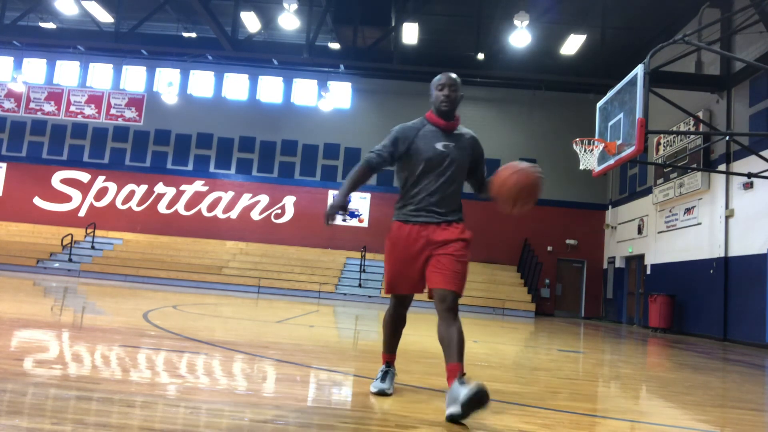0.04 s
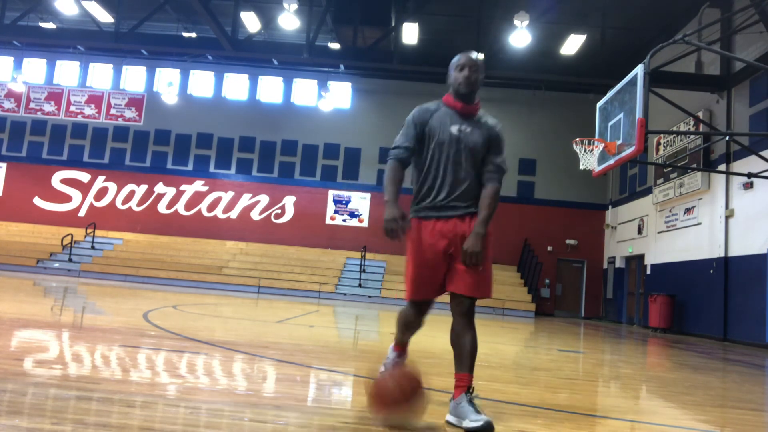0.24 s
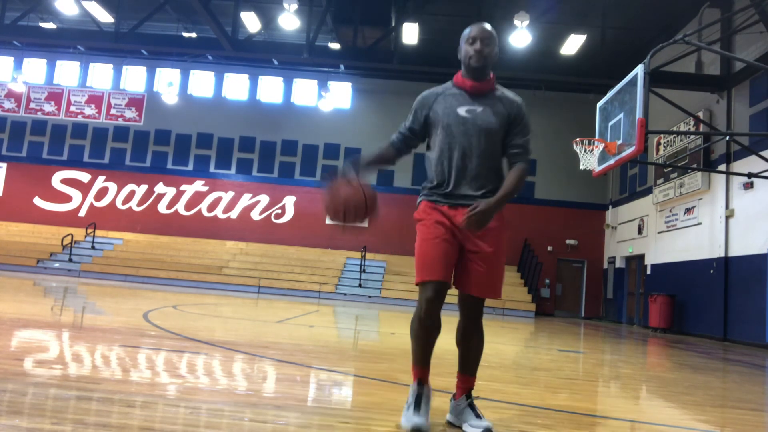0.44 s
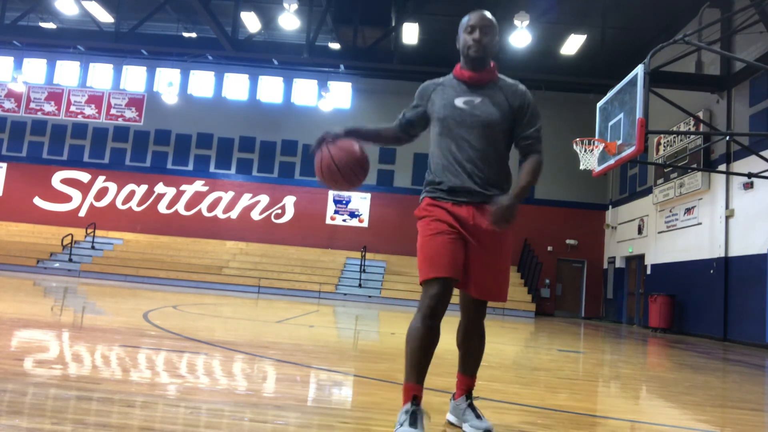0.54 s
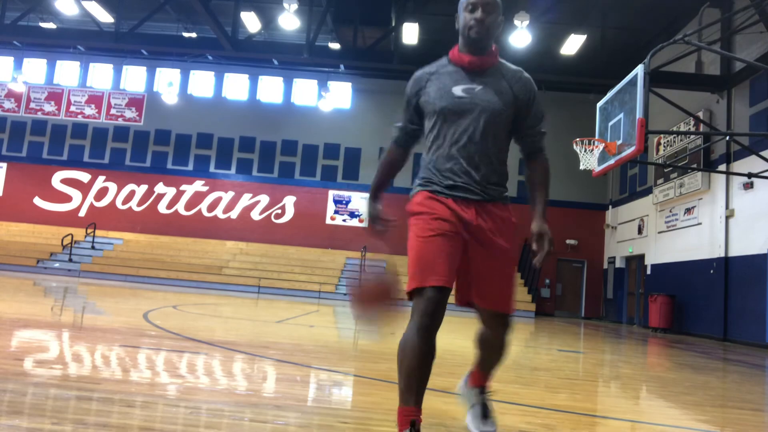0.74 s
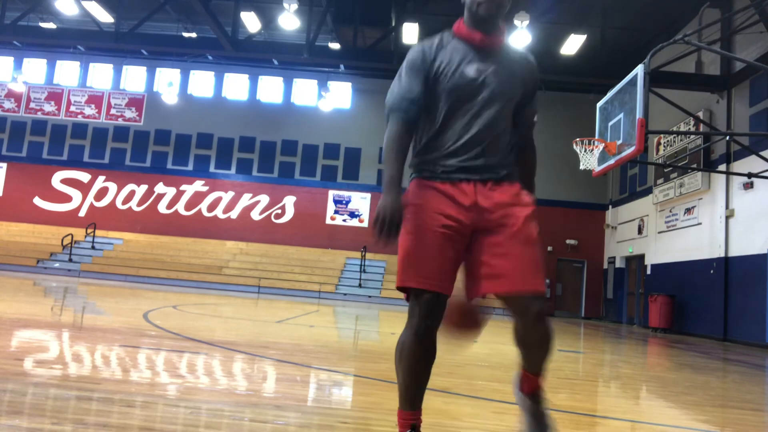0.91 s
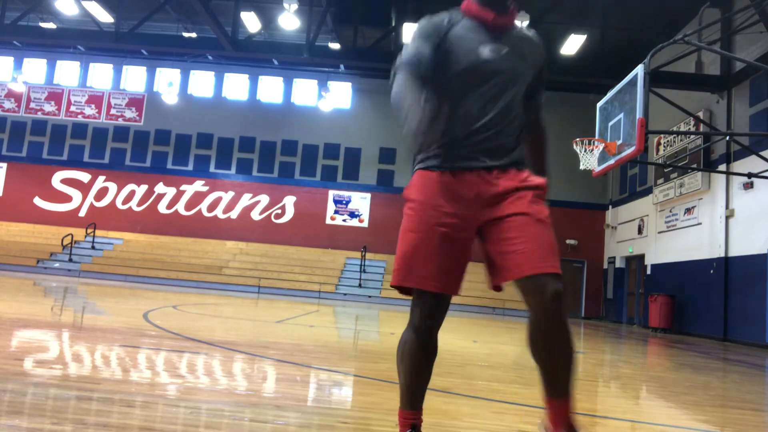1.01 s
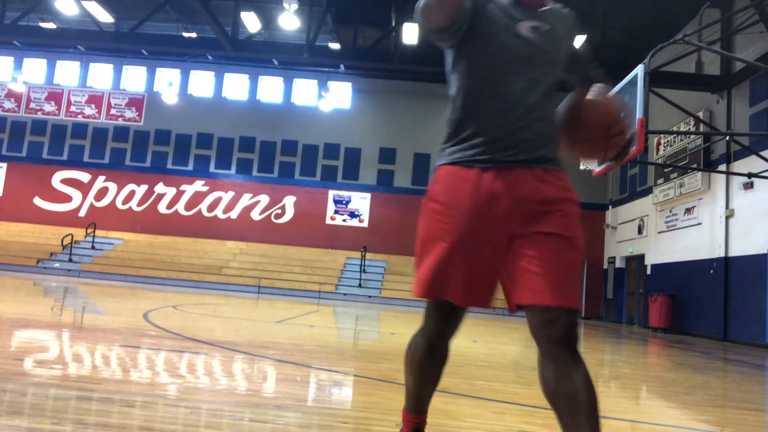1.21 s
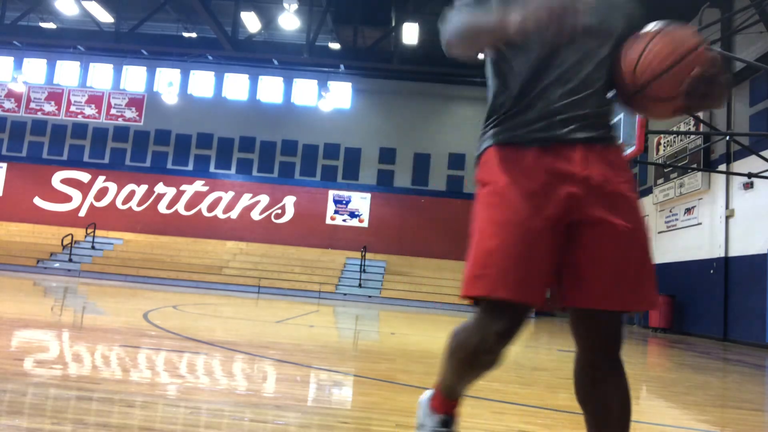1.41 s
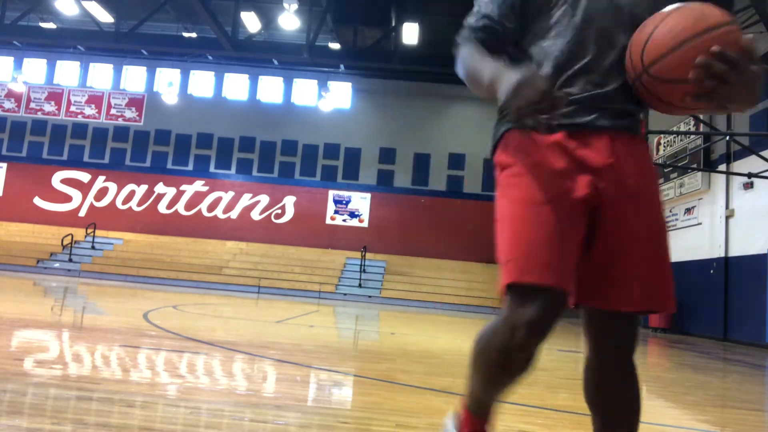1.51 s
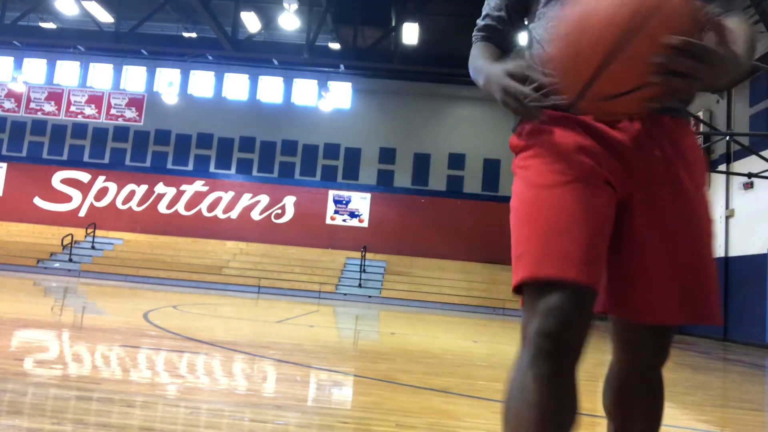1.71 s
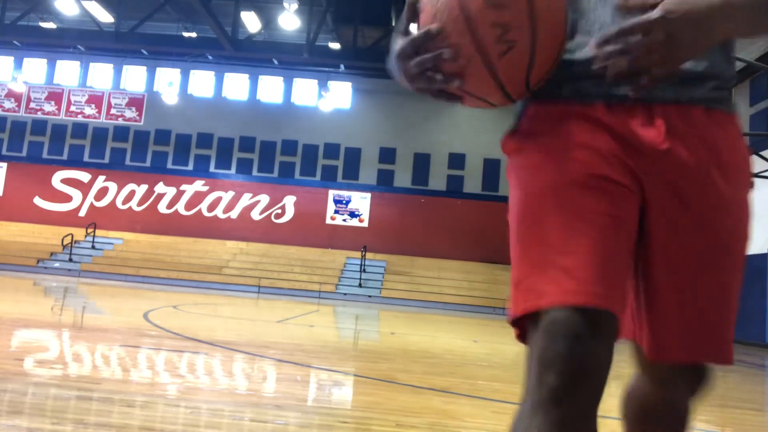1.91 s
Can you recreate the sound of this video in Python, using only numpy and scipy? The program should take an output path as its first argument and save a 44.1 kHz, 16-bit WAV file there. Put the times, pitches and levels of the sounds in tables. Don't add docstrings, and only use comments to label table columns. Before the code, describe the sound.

A basketball bounces twice in a big, ringing sports hall, heard close from the wooden floor. Over faint ventilation, an earlier bounce's echo and soft knocks, a hard slap with a hollow ping and low boom lands at 0.24 s, shaking the phone into rapid clicks. A softer bounce follows at 0.82 s with brief rattling. Soft steps at 1.2 and 1.8 s, tiny ticks and cloth rustle under the fading reverb.

```python
import sys
import numpy as np
from scipy import signal
from scipy.fft import rfft, irfft, next_fast_len
from scipy.io import wavfile
from scipy.ndimage import map_coordinates

SR = 44100
rng = np.random.default_rng(int(sys.argv[2]) if len(sys.argv) > 2 else 0)


def gain_from_db(level_db):
    decades = np.asarray(level_db, float) / 20
    return 10 ** decades


def master(y):
    cut = np.clip(np.atleast_2d(y).T, -1, 1)
    pcm = np.round(cut * 32767)
    wavfile.write(sys.argv[1], SR, pcm.astype(np.int16))


N = 85995

# start in seconds, slap in dB, floor wave in dB, board rumble in dB, hall in dB.
BOUNCES = [
    (0.2392, -3.5, -8, -17, -30.5),
    (0.8163, -9.5, -10.5, -22.5, -33.5),
]
CONTACT_DB = [0.5, 3.5]
REBOUND_DB = [-15, -5.5]
# frequency in Hz, level in dB, 60 dB decay in seconds.
BALL_MODES = [(1242, 1, 0.013), (1716, -11, 0.033), (2090, -9, 0.015), (2346, -1.5, 0.0091),
              (3683, -1.5, 0.0061), (4000, -24.5, 0.017), (5650, -1, 0.0026), (7050, -19, 0.024)]
# frequency in Hz, level in dB.
CONTACT_COLOUR = [(700, -39), (2500, -1.5), (5000, -0.5), (9000, -7.5), (13000, -5.5), (16000, -21)]
# frequency in Hz, level in dB, time to peak in seconds.
JOISTS = [(76.1, -3.5, 0.034), (49.2, -6, 0.017)]
# frequency in Hz, width in Hz, level in dB.
BOARD_MODES = [(222.2, 47, 3), (366, 54, -2.5), (449.3, 36, 3), (583.3, 86, 0.5), (607.3, 41, 4.5),
               (747, 113, -11), (900, 106, -11)]
# start in seconds, body in dB, click in dB, body frequency in Hz.
CHATTER = [(.2512, -20, -40, 2600), (.2728, -42, -32.5, 2600), (0.2805, -30, -50, 2940),
           (0.2817, -15, -41, 2800), (0.2942, -13.5, -25, 2600), (0.306, -4.5, -21, 2640),
           (0.3178, -11.5, -22, 2650), (0.331, -17, -29.5, 2830), (.353, -28, -56, 4000),
           (0.8502, -19.5, -28, 2400), (0.874, -27, -62, 2310), (0.8955, -13.5, -30.5, 2620)]
# frequency in Hz, level in dB.
CLICK_COLOUR = [(2500, -25.5), (4500, -8), (7000, 1.5), (10300, -4.5), (11300, -20), (16000, -30)]
# start in seconds, level in dB,
# frequency in Hz, 60 dB decay in seconds.
KNOCKS = [(0.046, -34.5, 203, 0.071), (0.073, -24.5, 110, 0.08), (0.619, -25.5, 120, .15),
          (0.714, -24, 75, 0.33), (.8572, 1, 566, 0.016), (0.8609, -8.5, 214, 0.028),
          (1.175, -21, 226.7, 0.097), (1.192, -21, 140, 0.11), (1.305, -24.5, 85.5, 0.18),
          (1.8054, -27, 227, 0.02), (1.812, -22, 191, 0.041)]
# start in seconds, level in dB, 60 dB decay in seconds.
STEPS = [
    (1.176, -36, 0.23),
    (1.812, -44, 0.32),
    (1.849, -46.5, 0.48),
]
# start in seconds, ring in dB, ring frequency in Hz, click in dB.
TICKS = [(.205, -66, 9100, -65), (0.403, -45, 12400, -43), (0.413, -53, 6100, -40.5),
         (0.631, -31.5, 1400, -57.5), (0.6973, -43.5, 7500, -43.5), (0.7096, -49, 4500, -48),
         (0.733, -61, 5000, -65), (1.013, -26.5, 1150, -43), (1.169, -39, 1200, -47.5),
         (1.721, -62, 3500, -49), (1.847, -43, 1630, -52)]
# frequency in Hz, level in dB.
TICK_COLOUR = [(1500, -41), (3000, 6), (9000, -2), (14000, -18), (16500, -30)]
# start in seconds, length in seconds, level in dB, thinned out below this many Hz.
RUSTLES = [(0.133, 0.02, -64.5, 4000), (0.394, 0.078, -70, 9000), (0.488, 0.035, -63, 9000),
           (0.627, 0.034, -58.5, 11000), (0.673, 0.08, -70, 6400), (1.105, 0.26, -68.5, 9100),
           (1.24, 0.16, -60.5, 4940), (1.479, 0.094, -65.5, 4000), (1.657, .03, -68.5, 3000),
           (1.692, 0.17, -65.5, 6040)]
# frequency in Hz, level in dB.
CLOTH_COLOUR = [(2350, -18), (4000, 2), (4350, -1.5), (13300, -15.5), (15700, -18), (16500, -54)]
# frequency in Hz, level in dB.
HALL_COLOUR = [(40, -2), (130, 0), (620, -16.5), (900, -25), (2700, -28), (3000, -33), (9000, -34.5),
               (16500, -53)]
# frequency in Hz, 60 dB decay in seconds.
HALL_T60 = [(60, 4.6), (200, 2.35), (500, 1.73), (1300, 1.685), (4000, 1.505), (9000, .9), (16000, .5)]
# frequency in Hz, width in Hz, level in dB.
HALL_NOTES = [(1150, 150, 1.5), (1400, 250, 0), (2256, 560, -0.5), (2600, 120, -15.5), (3610, 700, -3.5),
              (4500, 370, -8), (7500, 300, -6)]
# frequency in Hz, level in dB.
VENTILATION_COLOUR = [(40, -3), (105, -1.5), (368, -11.5), (809, -27.5), (2600, -29.5), (3000, -35.5),
                      (8000, -40.5), (9000, -48), (16500, -43)]


def unit(x):
    return x / np.sqrt(np.mean(x ** 2) + 1e-20)


def along(points, hz):
    f, v = np.transpose(points)
    return np.interp(np.log(hz + 1), np.log(f + 1), v)


def filtered(x, response):
    m = next_fast_len(len(x) + 8192)
    return irfft(rfft(x, m) * response(np.fft.rfftfreq(m, 1 / SR)), m)[:len(x)]


def noise(colour):
    return unit(filtered(rng.standard_normal(N), lambda hz: gain_from_db(along(colour, hz))))


def impulse(start, colour):
    click = 1. * (np.arange(N) == round(start * SR))
    pulse = filtered(click, lambda hz: gain_from_db(along(colour, hz)))
    return pulse / pulse.max()


def since(start):
    return np.maximum(np.arange(N) / SR - start, 0)


def struck(t, t60, rise_s):
    return (1 - np.exp(-t / rise_s)) * gain_from_db(-60 * t / t60)


def swell(t, peak_s, sharp):
    return (t / peak_s * np.exp(1 - t / peak_s)) ** sharp


def sine(hz, t):
    return np.sin(2 * np.pi * hz * t)


def ball_in_air(start, contact_db):
    t = since(start)
    ping = np.zeros(N)
    for hz, db, t60 in BALL_MODES:
        ping += gain_from_db(db) * struck(t, t60, 0.00018) * np.sin(2 * np.pi * (hz * t + rng.random()))
    slap = gain_from_db(-10) * struck(t, 0.0063, 0.0001)
    peel = gain_from_db(-25.5) * struck(t, 0.036, 0.001)
    rubber = noise([(500, -40), (4000, 0), (13000, -3), (16500, -20)])
    return ping + (slap + peel) * rubber + gain_from_db(contact_db) * impulse(start, CONTACT_COLOUR)


def floor_wave(t):
    final_hz, sweep_hz, sweep_s = 120, 733, 0.0027
    rise_s, hold_s, t60 = 0.0033, 0.028, 0.058
    cycles = final_hz * t + sweep_hz * sweep_s * (1 - np.exp(-t / sweep_s))
    envelope = (1 - np.exp(-(t / rise_s) ** 2)) * gain_from_db(-60 * np.maximum(t - hold_s, 0) / t60)
    wave = envelope * np.cos(2 * np.pi * (cycles - 0.12))
    for hz, db, peak_s in JOISTS:
        wave += gain_from_db(db) * swell(t, peak_s, 2.2) * sine(hz, t)
    return wave


def boards():
    def wood(f):
        total = 0
        for k, (hz, width, db) in enumerate(BOARD_MODES):
            loss = 1j * f * width
            total = total + (-1) ** k * gain_from_db(db) * loss / (hz * hz - f * f + loss)
        return total / (1 + (f / 1100) ** 6)
    return unit(filtered(rng.standard_normal(N), wood))


def ball():
    out = np.zeros(N)
    rebound = round(0.001101 * SR)
    for bounce, contact_db, rebound_db in zip(BOUNCES, CONTACT_DB, REBOUND_DB):
        start, slap_db, wave_db, rumble_db, _ = bounce
        t = since(start)
        air = ball_in_air(start, contact_db)
        out += gain_from_db(slap_db) * (air - gain_from_db(rebound_db) * np.roll(air, rebound))
        out += gain_from_db(wave_db) * floor_wave(t)
        out += gain_from_db(rumble_db) * swell(t, 0.034, 1.86) * boards()
    return out


def phone():
    out = np.zeros(N)
    for start, body_db, click_db, hz in CHATTER:
        t = since(start)
        case = sine(hz, t) + gain_from_db(-9.5) * sine(1.194 * hz, t)
        out += gain_from_db(body_db) * struck(t, 0.0058, 0.00037) * case
        scrape = struck(t, 0.0036, 0.00056) * noise(CLICK_COLOUR)
        out += gain_from_db(click_db) * (scrape + 1.4 * impulse(start + 0.0003, CLICK_COLOUR))
    return out


def feet():
    out = np.zeros(N)
    for start, db, hz, t60 in KNOCKS:
        t = since(start)
        out -= gain_from_db(db) * struck(t, t60, 0.59 / hz) * sine(hz, t / (1 + 2.4 * t))
    for start, db, t60 in STEPS:
        out += gain_from_db(db) * struck(since(start), t60, 0.0059) * boards()
    return out


def fingers_and_laces():
    out = np.zeros(N)
    for start, ring_db, hz, click_db in TICKS:
        t = since(start)
        touch = gain_from_db(ring_db) * sine(hz, t) + gain_from_db(click_db) * noise(TICK_COLOUR)
        out += struck(t, 0.012, 0.0005) * touch
    return out


def cloth():
    out = np.zeros(N)
    wander = rng.standard_normal(N // 200 + 4)
    grain = gain_from_db(1.3 * map_coordinates(wander, [np.arange(N) / 200]))
    for start, length, db, edge_hz in RUSTLES:
        fabric = unit(filtered(noise(CLOTH_COLOUR), lambda hz: 1 / (1 + (edge_hz / (hz + 1)) ** 3)))
        stroke = np.abs(np.sin(np.pi * np.minimum(since(start) / length, 1))) ** 0.6
        out += gain_from_db(db) * stroke * grain * fabric
    return out


def hall():
    def ball_notes(f):
        power = 1
        for hz, width, db in HALL_NOTES:
            power = power + gain_from_db(12.5 + db) ** 2 / (1 + (2 * (f - hz) / width) ** 2)
        return np.sqrt(power)
    out = np.zeros(N)
    earlier = (-0.48, -30)
    for start, db in [earlier] + [(row[0], row[-1]) for row in BOUNCES]:
        hz, t, z = signal.stft(unit(filtered(noise(HALL_COLOUR), ball_notes)), SR, nperseg=512)
        z = z * gain_from_db(-60 * np.maximum(t - start, 0) / along(HALL_T60, hz)[:, None])
        after = since(start)
        near = 1 - np.exp(-after / 0.004)
        far_walls = gain_from_db(-11.5) * (1 - np.exp(-(after / 0.13) ** 3))
        out += gain_from_db(db) * (near + far_walls) * signal.istft(z, SR, nperseg=512)[1][:N]
    return out


def ventilation():
    return gain_from_db(-49.5) * noise(VENTILATION_COLOUR)


def scene():
    close = ball() + phone() + feet() + fingers_and_laces() + cloth()
    return (close + hall() + ventilation())[None]


def roll_off(x):
    return signal.sosfilt(signal.butter(12, 16810, fs=SR, output="sos"), x)


def record(dry):
    low_hz, top_hz = 39.7, 16200

    def low_cut(hz):
        return (1j * hz / (low_hz + 1j * hz)) ** 3 / (1 + (30 / (hz + 1)) ** 6)
    x = filtered(dry[0], low_cut)
    x = x / (1 + np.abs(x) ** 4) ** (1 / 4)
    mix = filtered(x, lambda hz: 1 / (1 + (hz / top_hz) ** 60))[None]
    return roll_off(mix)


dry = scene()
out = record(dry)
master(out)
```